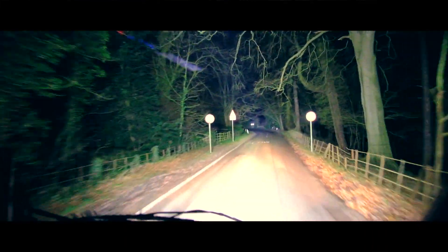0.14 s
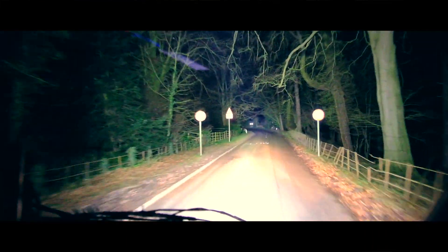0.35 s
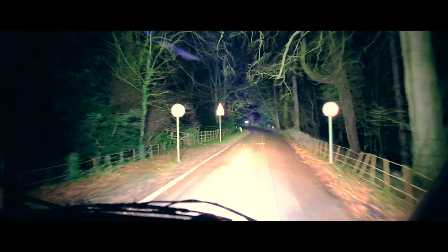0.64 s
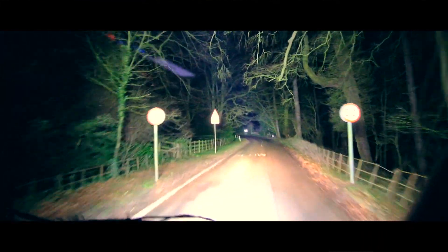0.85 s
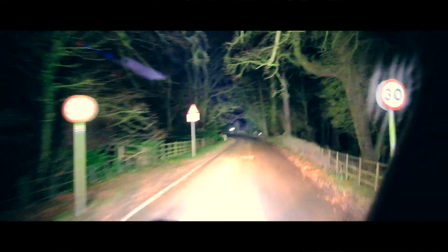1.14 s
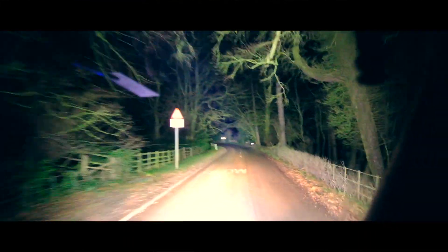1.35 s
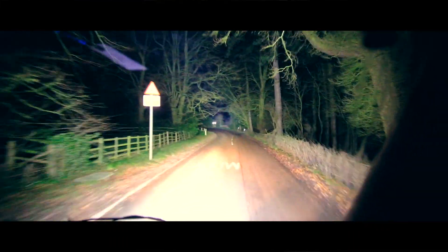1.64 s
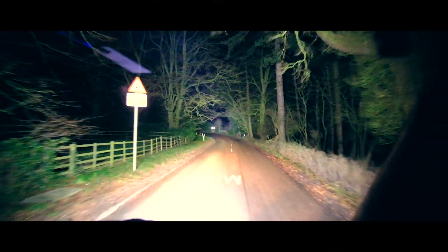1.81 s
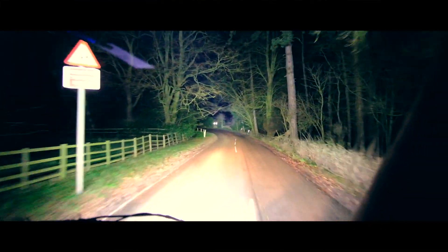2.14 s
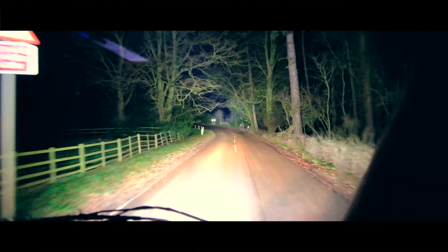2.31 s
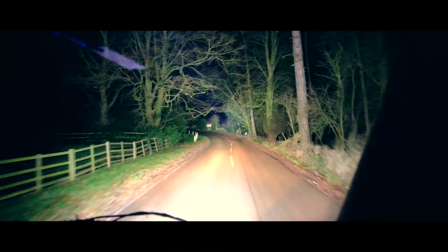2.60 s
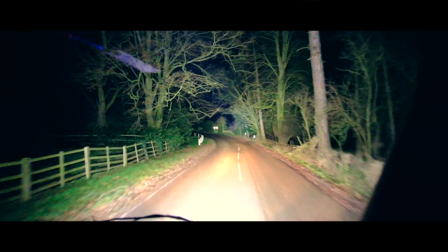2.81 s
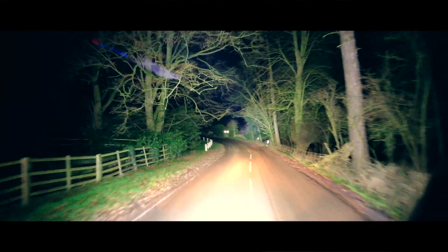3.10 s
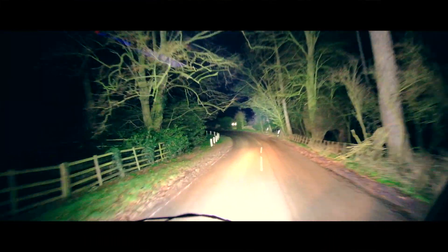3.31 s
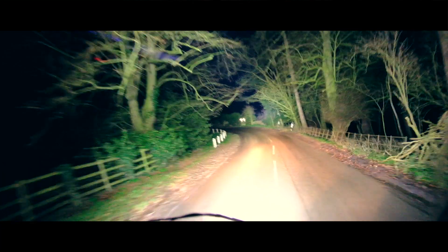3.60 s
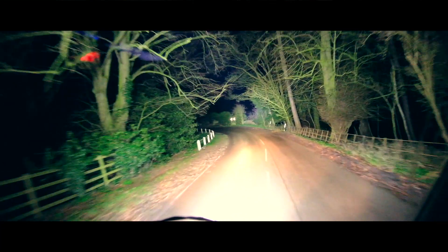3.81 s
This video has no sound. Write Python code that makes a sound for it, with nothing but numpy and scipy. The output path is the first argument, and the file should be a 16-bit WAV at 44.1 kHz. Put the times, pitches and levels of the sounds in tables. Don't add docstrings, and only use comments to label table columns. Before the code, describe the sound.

A van cab rattles along a road over a steady low engine and tyre drone

```python
import sys
import numpy as np
from scipy import signal
from scipy.fft import rfft, irfft
from scipy.io import wavfile

SR = 44100
rng = np.random.default_rng(int(sys.argv[2]) if len(sys.argv) > 2 else 0)


def voltage_ratio(level):
    return 10 ** (np.asarray(level, float) / 20)


def pcm_store(signal):
    levels = np.round(np.clip(np.atleast_2d(signal), -1, 1) * 32767)
    wavfile.write(sys.argv[1], SR, levels.astype(np.int16).T)


N = 174195


def rms_one(x):
    return x / np.sqrt(np.mean(x ** 2) + 1e-20)


def in_time(rows):
    s, value = np.transpose(rows)
    return np.interp(np.arange(N) / SR, s, value)


def drift(rate):
    hop = 40
    pole = np.exp(-2 * hop * np.pi * rate / SR)
    white = rng.standard_normal(N // hop + 2002)
    slow = signal.lfilter([1], [1, -2 * pole, pole * pole], white)[2000:]
    return np.interp(np.arange(N) / hop, np.arange(len(slow)), rms_one(slow - slow.mean()))


def coloured(spectrum, patchy_db):
    hz, db = np.transpose(spectrum)
    f = np.fft.rfftfreq(N, 1 / SR) + 1
    gain_db = np.interp(np.log(f), np.log(hz), db, left=-200, right=-200)
    shaped = rfft(rng.standard_normal(N)) * voltage_ratio(gain_db)
    half_octave = 2 * np.log2(f)
    together = drift(12.0)
    out = np.zeros(N)
    for k in range(int(2 * np.log2(hz[0])), int(2 * np.log2(hz[-1])) + 2):
        band = irfft(shaped * np.clip(1 - abs(half_octave - k), 0, 1), N)
        out += band * voltage_ratio(patchy_db * (0.78 * together + drift(8)))
    return rms_one(out)


def clicks_at(s, db):
    out = np.full(N, 1e-18)
    np.add.at(out, np.clip((s * SR).astype(int), 0, N - 1), voltage_ratio(db))
    return out


def struck(s, db, modes, spread_db, contact_s, tilt_db=0):
    out = np.zeros(N)
    chance = rng.standard_normal((len(s), len(modes)))
    fade, scuff = 0, 1
    if contact_s:
        fade = np.exp(-1 / (contact_s * SR))
        scuff = rng.choice([-1, 1], N)
    for k, (hz, mode_db, t60) in enumerate(modes):
        r, w = voltage_ratio(-60 / (t60 * SR)), 2 * np.pi * hz / SR
        tilt = tilt_db * np.log2(hz / 1700)
        hits = clicks_at(s, db + mode_db + spread_db * chance[:, k] + tilt)
        hits = signal.lfilter([np.sqrt(1 - fade ** 2)], [1, -fade], hits) * scuff
        out += (-1) ** k * signal.lfilter([0, np.sin(w)], [1, -2 * r * np.cos(w), r * r], hits)
    return out


# t/s, rate/Hz
WHEEL = [
    (0, 4.86),
    (.9, 4.86),
    (1.5, 4.905),
    (2.25, 4.94),
    (2.75, 4.98),
    (3.25, 4.935),
    (3.95, 4.83),
]
WHEEL_ORDERS = [5, 7, 9, 10, 13, 15, 17, 18, 20, 23, 34]
WHEEL_ORDER_DB = [-31, -30, -30.5, -40, -30, -27.5, -25, -20, -19, -32, -34.5]
# t/s, level/dB
BOOM = [
    (0, -3),
    (.5, 4),
    (.9, -9.5),
    (1.2, -5),
    (1.5, 4.5),
    (2.2, -2),
    (2.6, 0),
    (3.3, 2.5),
    (3.7, -2.5),
    (3.95, 5.5),
]


def wheels():
    thump_s, wander_db = .155, 2.5
    turns = np.cumsum(in_time(WHEEL)) / SR
    turns = turns - turns[int(thump_s * SR)]
    boom_db = in_time(BOOM)
    out = np.zeros(N)
    for order, db in zip(WHEEL_ORDERS, WHEEL_ORDER_DB):
        level_db = db + 1.5 + wander_db * drift(0.75) + boom_db * (order in (15, 17, 18))
        out += voltage_ratio(level_db) * np.cos(2 * np.pi * order * turns)
    return out


FIRING_ORDER_DB = [-36, -19.5, -38]
LOAD_SHARE = [0, 1, -.6]
# t/s, level/dB
LOAD = [
    (0, -8.5),
    (1.3, -2),
    (1.9, -11.5),
    (2.1, 2),
    (2.75, -1.5),
    (3.0, -8.5),
    (3.95, -4.5),
]


def engine():
    firing_hz = 62.3 * (1 + 0.0029 * drift(0.83))
    phase = 2 * np.pi * np.cumsum(firing_hz) / SR
    load_db = in_time(LOAD)
    out = np.zeros(N)
    for k, db in enumerate(FIRING_ORDER_DB):
        out += voltage_ratio(db + LOAD_SHARE[k] * load_db + 2.1 * drift(2.1)) * np.sin((k + 1) * phase)
    return out


# t/s, level/dB
ROAR = [
    (0, -26.5),
    (.6, -26.5),
    (1.4, -21),
    (2.1, -24.5),
    (2.6, -26),
    (3.2, -30.5),
    (3.6, -18.5),
    (3.95, -26.5),
]
# f/Hz, density level/dB per Hz
RUMBLE = [(9, -46), (16, -11), (32, -15), (60, -6), (90, -1), (135, -6), (186, -5.5), (250, -14),
          (330, -14), (450, -50)]
# f/Hz, density level/dB per Hz
ROAD = [(170, -12.5), (260, -1), (380, -3), (520, -5.5), (850, -11), (930, -16), (1700, -20.5),
        (3500, -39.5), (5500, -59)]
# f/Hz, density level/dB per Hz
WIND = [(1470, -53), (2500, -2.5), (3690, -7.5), (4020, -5), (5150, -9), (8660, -15.5), (10800, -25.5),
        (11900, -23), (16000, -32)]


def roughness():
    roar_db = in_time(ROAR)
    return roar_db - roar_db.mean()


def road():
    rough_db = roughness()
    hiss = voltage_ratio(-45.5 + 0.15 * rough_db) * coloured(WIND, patchy_db=.6)
    roar = voltage_ratio(-25.0 + 0.17 * rough_db) * coloured(ROAD, patchy_db=.8)
    rumble = voltage_ratio(-17.5) * coloured(RUMBLE, patchy_db=0.6)
    return rumble + roar + hiss


# f/Hz, level/dB, t60/s
PANEL_MODES = [(330, -17, .025), (650, -14, .016), (1050, -10, .016), (1270, -11, .013), (1480, -8, .016),
               (1760, -7, .016), (2000, -8, .013), (2350, -8, .011), (2700, -9, .01), (3000, -8, .01),
               (3400, -11, .008), (3900, -15, .006)]


def creaks():
    creaks_per_s = 80
    when, size = rng.random((2, int(creaks_per_s * N / SR)))
    rough_db = roughness()[(when * N).astype(int)]
    level_db = -36 + 9 * size ** 2 + 1.0 * rough_db
    return struck(when * N / SR, level_db, PANEL_MODES, spread_db=3, contact_s=.002)


# t/s, peak level/dB
TINKLES = [(0.0508, -34), (0.108, -44), (0.2059, -42), (0.369, -46), (0.543, -50), (0.8624, -31),
           (0.9018, -38), (0.9273, -41), (1.269, -32), (1.2885, -39), (1.3004, -30), (1.51, -35),
           (1.528, -34), (1.5758, -39), (1.65, -21), (1.6945, -25), (1.7584, -33), (1.7794, -47),
           (1.978, -35), (2.032, -39), (2.381, -44), (2.425, -30),
           (2.4708, -37), (2.4872, -39), (2.683, -36), (2.9248, -32), (3.087, -35), (3.1092, -36),
                (3.1288, -37), (3.269, -37), (3.3114, -43), (3.3303, -31), (3.3527, -36), (3.488, -38),
                (3.5428, -33), (3.5848, -38), (3.6696, -40), (3.69, -32), (3.7524, -32.5), (3.7978, -35),
                (3.8447, -45), (3.909, -32), (3.927, -35), (3.945, -36)]
# f/Hz, level/dB, t60/s
TINKLE_MODES = [(11450, -10, .012), (11620, -5, .017), (11790, -6, .018), (12030, -8, .014)]


def tinkles():
    s, db = np.transpose(TINKLES)
    return struck(s, db, TINKLE_MODES, spread_db=4, contact_s=.0015)


# t/s, peak level/dB
KNOCKS = [(0.0748, -16.5), (0.0913, -11.5), (0.402, -11.5), (0.566, -13), (0.903, -12), (1.087, -17),
          (1.304, -13.5), (1.649, -10), (1.694, -11.5), (1.8972, -11), (2.046, -12), (2.1121, -13),
          (3.0516, -10.5), (3.563, -8)]


def knocks():
    s, db = np.transpose(KNOCKS)
    return struck(s, db, PANEL_MODES, spread_db=2.5, contact_s=0, tilt_db=-3)


# t/s, peak level/dB
CLINKS = [(0.075, -23), (0.2324, -32), (0.5666, -18.5), (0.824, -19.5), (0.857, -32), (0.8744, -36),
          (1.061, -32), (1.199, -34), (1.302, -31), (1.3438, -30), (1.6222, -27), (1.6506, -26),
          (1.6811, -35), (1.6985, -21), (1.8402, -19.5), (1.8936, -24), (1.9044, -23), (1.9954, -34),
          (2.0457, -23), (2.0554, -42), (2.066, -34), (3.051, -19.5), (3.0624, -31), (3.397, -37),
          (3.429, -24.5), (3.4374, -30.5), (3.4531, -24), (3.5603, -23), (3.5854, -31), (3.6057, -32),
          (3.6371, -36)]
# f/Hz, level/dB, t60/s
CLINK_MODES = [(4670, -13, .018), (4905, -5.5, .036), (4975, -7, .03), (5200, -15, .012), (5850, -14, .022),
               (6550, -12, .02), (6850, -11, .022), (7010, -10, .022), (7780, -14, .012), (9390, -15, .008),
               (11600, -16, .006)]


def clinks():
    s, db = np.transpose(CLINKS)
    return voltage_ratio(7) * struck(s, db, CLINK_MODES, spread_db=2.5, contact_s=0)


# t/s, peak level/dB
CRACKS = [(0.0753, -17.5), (0.1171, -21), (0.144, -27.5), (0.2308, -26), (0.238, -39), (0.2748, -33),
          (0.349, -31), (0.3995, -40), (0.5676, -12), (0.596, -29), (0.664, -27), (0.7173, -30.5),
          (0.76, -24), (0.823, -18), (0.876, -21.5), (0.93, -25.5), (0.983, -28.5), (1.0375, -26),
          (1.0874, -24), (1.1446, -20.5), (1.198, -26.5), (1.2481, -32), (1.3006, -21), (1.344, -16),
          (1.4985, -28), (1.544, -28),
          (1.5892, -23.5), (1.6458, -21), (1.6498, -15), (1.6816, -34), (1.694, -17), (1.731, -27),
               (1.769, -25), (1.8083, -29), (1.84, -15), (1.893, -10), (1.9046, -36), (1.9949, -29),
               (2.045, -22), (2.0906, -39), (2.1116, -23), (2.2722, -37), (2.803, -27), (2.8416, -28.5),
               (2.9469, -27), (2.9956, -40), (3.051, -16), (3.3967, -34), (3.453, -21.5), (3.5344, -29),
               (3.561, -24), (3.57, -27), (3.6095, -25), (3.6546, -20.5), (3.6728, -24.5), (3.947, -40)]


def cracks():
    lag_s, snap_t60_s, body_t60_s, tail_t60_s = .001, .003, 0.0077, 0.06
    s, db = np.transpose(CRACKS)
    out = np.zeros(N)
    for low_hz, high_hz, band_db, snap_db in ((4450, 9240, 0, -13.5), (10700, 13300, -8.5, 4.0)):
        hits = clicks_at(s + lag_s, db + band_db - 6)
        snap, body, tail = (signal.lfilter([1], [1, -voltage_ratio(-60 / (t60 * SR))], hits)
                            for t60 in (snap_t60_s, body_t60_s, tail_t60_s))
        burst = (voltage_ratio(snap_db) * snap + body + voltage_ratio(-2) * tail) * rng.standard_normal(N)
        band = signal.butter(2, [low_hz, high_hz], "band", fs=SR, output="sos")
        out += signal.sosfilt(band, burst)
    return out


# t/s, peak level/dB, brightness/dB per octave
TAPS = [(0.1453, -9.5, -1.5), (0.1891, -20.5, 1.5), (0.23, -14, -4), (0.2638, -19, -4.5), (0.313, -23, -2),
        (0.348, -12.5, 0.5), (0.594, -16, -2), (0.629, -15, -5), (0.6636, -20.5, 5.5), (0.7634, -9.5, -2.5),
        (0.8131, -19, -7), (0.84, -18.5, 0), (0.8844, -24, -7), (0.9976, -12.5, -0.5), (1.145, -28, -5),
        (1.2233, -24, -2), (1.2583, -18, 6.5), (1.335, -20, 0), (1.364, -20, -2), (1.497, -27, 4),
        (1.5496, -21.5, 1), (1.713, -21, 4.5), (1.736, -32, -2), (1.77, -17.5, 3), (1.8105, -16.5, 3),
        (1.8398, -17, -1), (1.874, -16.5, -2), (1.917, -23, 1.5), (2.0594, -22.5, 6), (2.0954, -30, -15),
        (2.111, -6.5, 3.5), (2.156, -22, -11), (2.2709, -14, 2.5), (2.4947, -17, -4), (2.5087, -20.5, 3),
        (2.805, -15.5, -4.5), (2.9064, -30, 5), (2.9452, -17.5, 3), (3.27, -30, 5), (3.3301, -13, -3),
        (3.3564, -18, 1.5), (3.4178, -23, -2), (3.4522, -19, 3), (3.477, -17, -3), (3.5107, -26, 5),
        (3.5332, -14, 4.5), (3.6227, -24, 7)]


def taps():
    s, db, bright_db = np.transpose(TAPS)
    return voltage_ratio(-0.5) * struck(s, db, PANEL_MODES, spread_db=3.0, contact_s=0, tilt_db=bright_db)


def cab(x):
    t60_s = .11
    t = np.arange(int(t60_s * SR)) / SR
    tail = rng.standard_normal(len(t)) * voltage_ratio(-60 * t / t60_s)
    tail = tail / np.sqrt(np.sum(tail ** 2))
    return x + voltage_ratio(-5) * signal.fftconvolve(x, tail)[:N]


def scene():
    rattles = creaks() + tinkles() + knocks() + clinks() + taps()
    return (wheels() + engine() + road() + cracks() + cab(voltage_ratio(-2) * rattles))[None]


def roll_off(x):
    return signal.sosfilt(signal.butter(12, 16360, fs=SR, output="sos"), x)


def record(dry):
    rounded = 1.3 * np.tanh(dry / 1.3)
    low_pass = signal.cheby2(10, 50, 16750, fs=SR, output="sos")
    mix = signal.sosfilt(low_pass, rounded)
    return roll_off(mix)


dry = scene()
out = record(dry)
pcm_store(out)
```